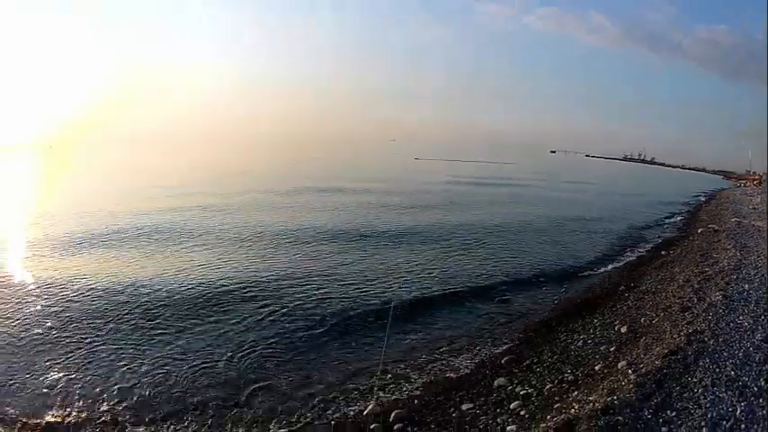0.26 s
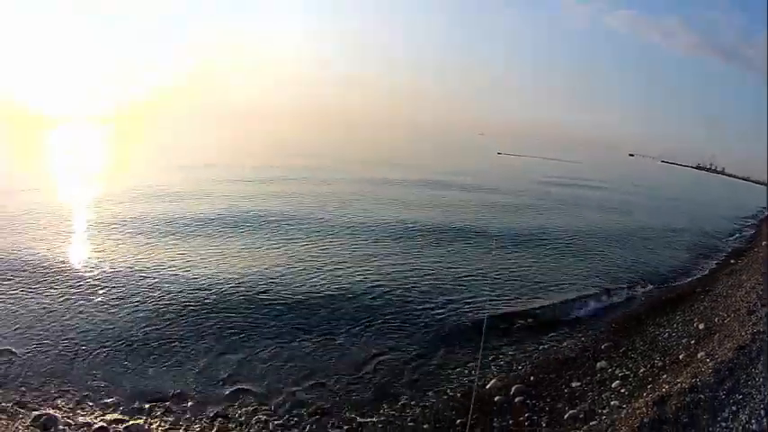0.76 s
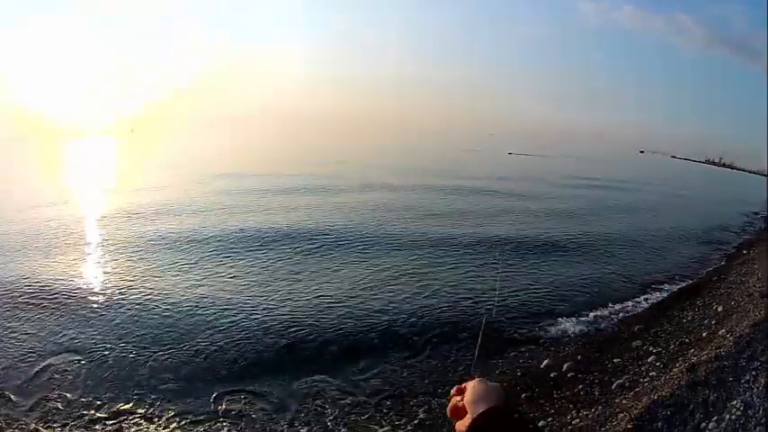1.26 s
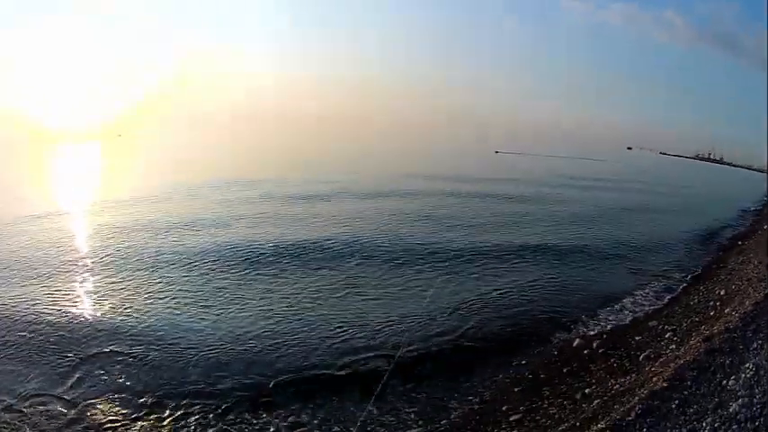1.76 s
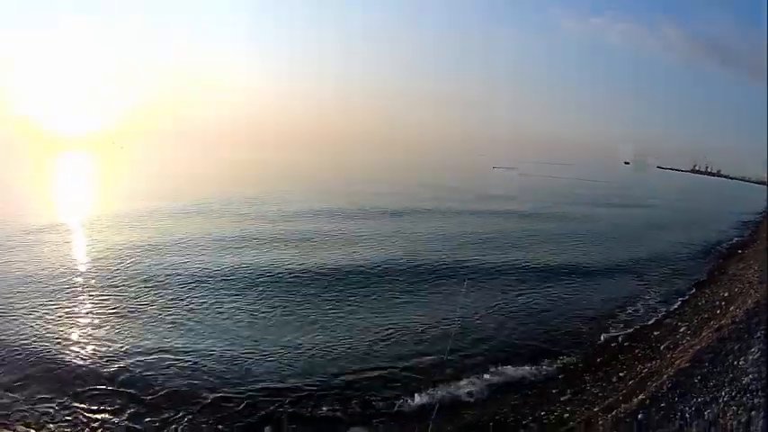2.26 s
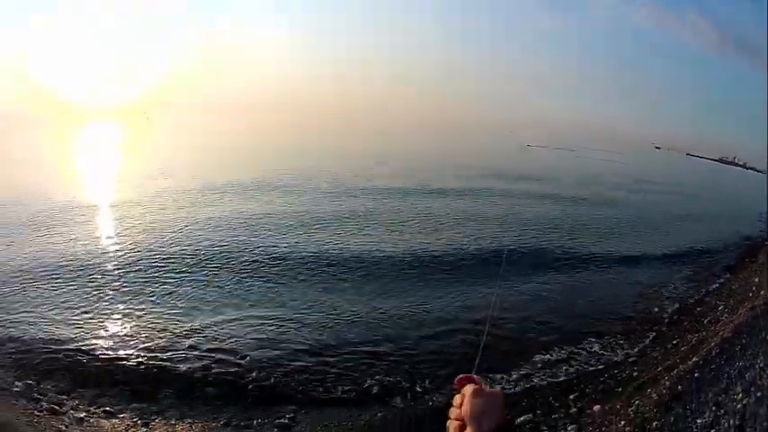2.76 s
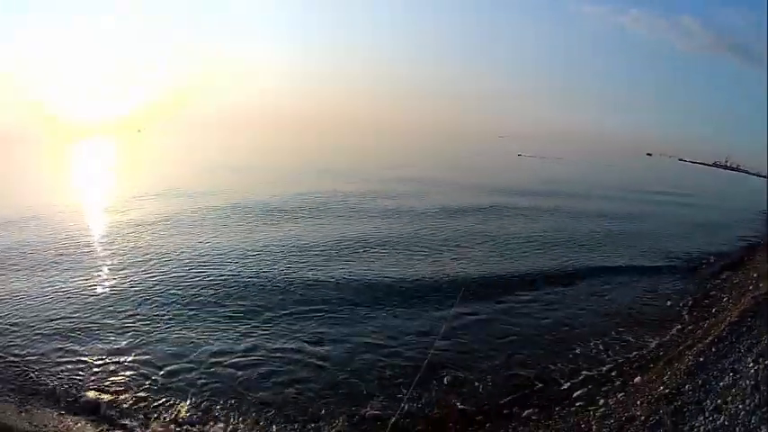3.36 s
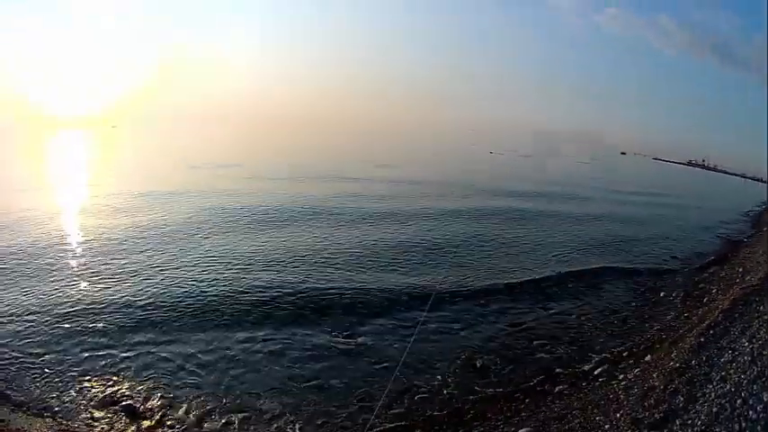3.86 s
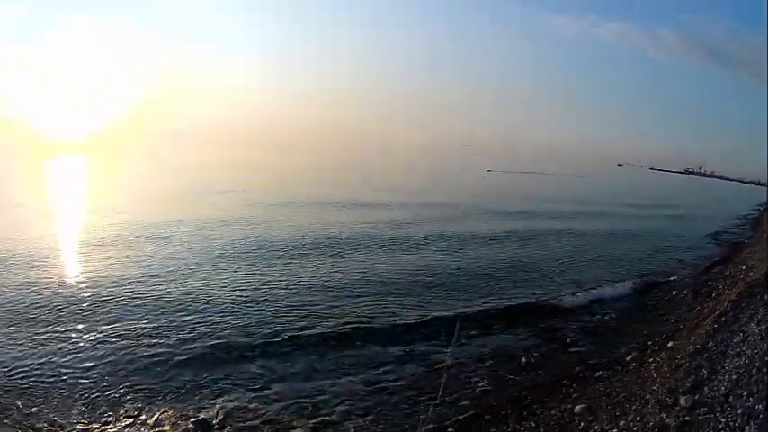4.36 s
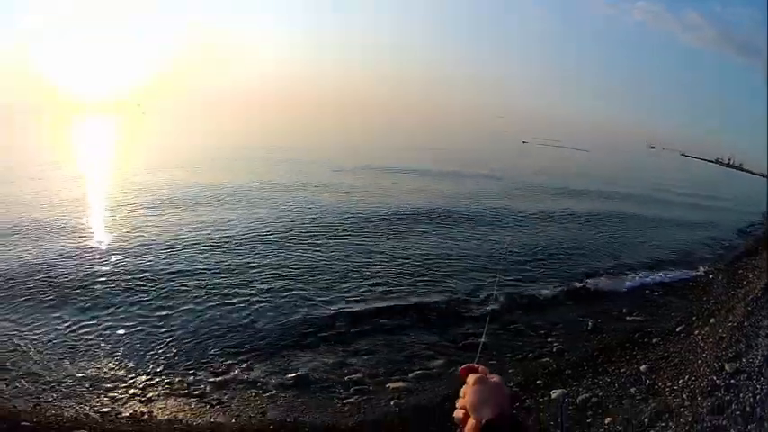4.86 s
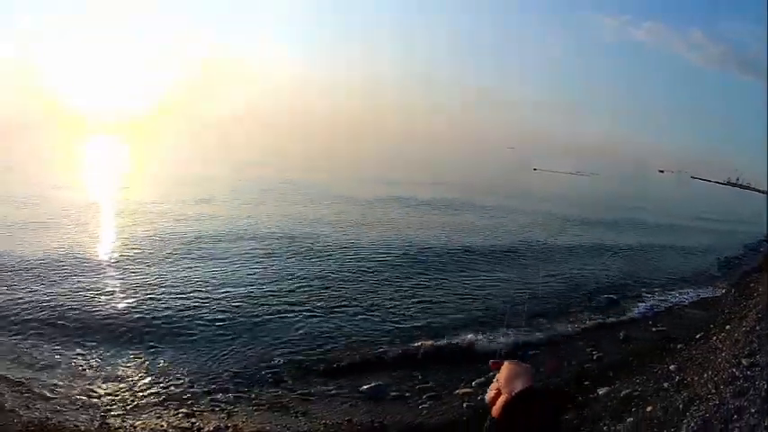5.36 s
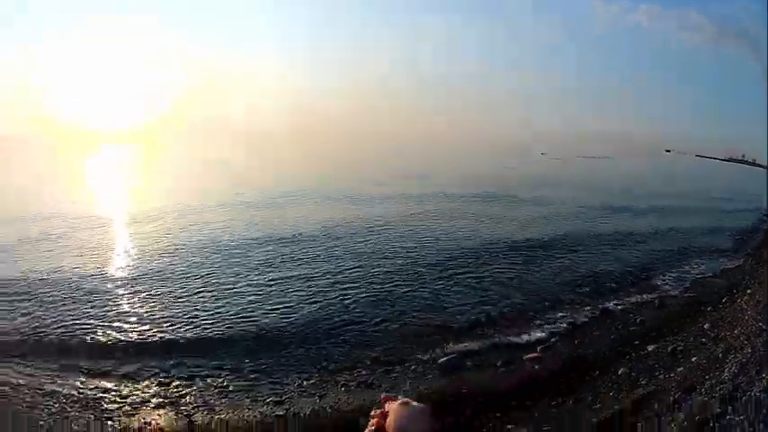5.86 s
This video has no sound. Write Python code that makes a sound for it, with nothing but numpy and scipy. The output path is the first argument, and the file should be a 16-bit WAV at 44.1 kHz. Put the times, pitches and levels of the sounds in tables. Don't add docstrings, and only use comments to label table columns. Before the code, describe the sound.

Close to the edge of a pebble beach, small waves wash in continuously with a muffled, bubbling gurgle. Air pockets gulp and large bubbles plop, the strongest one about a second in. Spray patters lightly, pebbles click faintly, and low wind rumbles unevenly on the microphone's case, which dulls the treble throughout.

```python
import sys
import numpy as np
from scipy import signal
from scipy.fft import rfft, irfft
from scipy.io import wavfile

SR = 44100
rng = np.random.default_rng(int(sys.argv[2]) if len(sys.argv) > 2 else 0)


def decibels_to_gain(level_db):
    exponent = np.asarray(level_db, float) / 20
    return 10 ** exponent


def master(y):
    cut = np.clip(np.atleast_2d(y).T, -1, 1)
    pcm = np.round(cut * 32767)
    wavfile.write(sys.argv[1], SR, pcm.astype(np.int16))


N = 269010

# (frequency [Hz], gain [dB])
CASE_RESPONSE = [(90, -17), (140, -7), (560, -1.5), (1430, -3.5), (1950, -14), (2600, -21), (3050, -25.5),
                 (3850, -24), (4450, -34), (6150, -33), (7950, -49.5), (8600, -46), (9600, -54.5),
                 (13000, -79)]
# (time [s], vigour [dB], share of big air pockets [dB])
SHORE_VIGOUR = [(0.0, -32.5, -8), (0.39, -42, -3.5), (0.47, -39, -6), (0.95, -35, 0), (1.19, -40.5, 1),
                (1.95, -44.5, -6.5), (2.1, -38, -4), (2.36, -37, -3), (2.53, -42.5, -6.5), (3.0, -43.5, 0),
                (3.2, -37.5, -6.5), (3.72, -45, -2.5), (4.33, -37, -6), (4.66, -37, -4), (4.8, -40.5, -3),
                (5.2, -38, -6), (5.45, -40, -8.5), (6.1, -43.5, -3.5)]


def rms_one(x):
    return x / np.sqrt(np.mean(x ** 2) + 1e-20)


def in_time(rows):
    s, *columns = np.transpose(rows)
    return [np.interp(np.arange(N) / SR, s, column) for column in columns]


def bursts(rows, attack_s, fade_db_per_s):
    s, length, db, *shares = np.transpose(rows)[:, :, None]
    coarse = np.arange(0, N, 32)
    age = coarse / SR - s
    rise = np.clip(age / attack_s + 1, 0, 1) ** 2
    power = rise * decibels_to_gain(2 * (db - fade_db_per_s * np.maximum(age - length, 0)))
    totals = [np.sum(power * decibels_to_gain(2 * share), axis=0) for share in [0, *shares]]
    return [np.interp(np.arange(N), coarse, total) for total in totals]


def band(x, low_hz, high_hz):
    return signal.sosfilt(signal.butter(2, [low_hz, high_hz], "band", fs=SR, output="sos"), x)


def drift(rate):
    r = np.exp(-80 * np.pi * rate / SR)
    slow = signal.lfilter([1], [1, -2 * r, r * r], rng.standard_normal(N // 40 + 2002))[2000:]
    return np.interp(np.arange(N) / 40, np.arange(len(slow)), rms_one(slow))


def response(points, size=16384):
    point_hz, point_db = np.transpose(points)
    hz = np.maximum(np.fft.rfftfreq(size, 1 / SR), 1)
    log_gain = np.log(decibels_to_gain(np.interp(np.log(hz), np.log(point_hz), point_db)))
    cepstrum = irfft(log_gain)
    cepstrum[1:size // 2] *= 2
    cepstrum[size // 2 + 1:] = 0
    return irfft(np.exp(rfft(cepstrum)))[:size // 2]


def through(x, impulse):
    return signal.oaconvolve(x, impulse)[:len(x)]


def bubble(hz, cycles, rise):
    turns = np.arange(int(cycles / hz * SR)) * hz / SR
    return np.sin(2 * np.pi * turns * (1 + rise * turns / cycles / 2)) * decibels_to_gain(-60 * turns / cycles)


def swarm(low_hz, high_hz, per_s, cycles, spread_db, clump_db, far_db, largest, count=12):
    sizes = decibels_to_gain(spread_db * np.minimum(rng.exponential(1, N), largest)) * rng.choice([-1, 1], N)
    clumps = decibels_to_gain(clump_db * (.6 * drift(13.0) + .8 * drift(40.0)))
    born = rng.random(N) < per_s * clumps / SR
    births = sizes * born
    dealt = rng.integers(0, count, N)
    pitches = np.geomspace(low_hz, high_hz, count)
    near = sum(hz * through(births * (dealt == k), bubble(hz, cycles, rise=0.26))
               for k, hz in enumerate(pitches))
    blur = band(rng.standard_normal(N), low_hz, high_hz)
    far = band(blur, low_hz * 1.197, high_hz * 1.33) * clumps ** 0.12
    return rms_one(through(rms_one(near) + decibels_to_gain(far_db) * rms_one(far), response(CASE_RESPONSE)))


def wash():
    # (time [s], length [s], level [dB], share of big air pockets [dB])
    surges = [(0.0, 0.016, -45, 5.5), (0.08, 0.088, -44, 4.5), (0.41, 0.03, -55, 15.5),
              (0.88, .14, -57, -6), (1.02, 0.023, -51, 4), (1.23, 0.16, -46, 3), (1.97, 0.015, -43, 4),
              (2.03, .05, -40, -18), (2.24, 0.07, -45.5, 7.5), (2.57, 0.035, -43, -1),
              (2.62, 0.072, -48, 2), (2.84, .06, -57, 9), (3.08, 0.045, -49, 1.5), (3.14, 0.026, -43.5, -6),
              (3.36, 0.11, -43.5, -19), (3.56, 0.091, -42.5, -7), (4.14, 0.042, -40, -0.5),
              (4.31, 0.087, -47, -12), (4.68, 0.045, -44, 1.5), (5.15, 0.17, -45, -1),
              (5.55, 0.26, -44.5, -9), (5.775, 0.064, -38.5, -5.5), (1.36, 0.16, -45.5, -11),
              (3.95, 0.17, -51.5, 5), (2.92, 0.15, -47, -10)]
    vigour_db, pockets_db = in_time(SHORE_VIGOUR)
    small, big = bursts(surges, attack_s=0.013, fade_db_per_s=246)
    gurgle = swarm(140.7, 534.0, per_s=450, cycles=22.4, spread_db=3.0, clump_db=2.5,
                   far_db=1.6, largest=2.5)
    bubbles = swarm(567, 1878, per_s=1400, cycles=22.4, spread_db=3.0, clump_db=4.0,
                    far_db=1.8, largest=2.7, count=18)
    steady = decibels_to_gain(2 * (vigour_db - 1.6))
    gurgle_power = steady * decibels_to_gain(2 * (pockets_db + 0.26)) + big
    return np.sqrt(gurgle_power) * gurgle + np.sqrt(steady + small) * bubbles


def spray():
    # (time [s], length [s], level [dB], share of spatter [dB], share of foam [dB])
    splashes = [(0.0, 0.28, -51.5, -13, -11), (0.36, 0.092, -55, -9, -13), (0.485, 0.025, -49, -5.5, -11.5),
                (0.57, 0.11, -56, -11, -8), (0.705, 0.26, -49.5, -7, -13.5), (1.03, 0.41, -55.5, -3.5, -13),
                (1.46, 0.3, -55.5, -9.5, -18), (1.97, 0.12, -50, -5.5, -15), (2.14, 0.21, -50.5, -5, -18),
                (2.47, 0.039, -49.5, -11, -27), (2.555, 0.056, -53, -5.5, -14),
                (2.645, 0.031, -54.5, -8.5, -18), (2.77, .1, -66.5, 1, -14), (3.06, 0.091, -54, -4.5, -10),
                (3.22, 0.14, -56, -0.5, -15), (3.39, 0.054, -53.5, -3, -19), (3.56, 0.11, -52, -3, -10.5),
                (4.09, 0.18, -53, -7.5, -11), (4.35, .31, -52, -7.5, -13.5), (4.7, 0.054, -52, -6, -11.5),
                (4.81, .04, -61, -6, -12), (4.93, 0.18, -57.5, -6, -16), (5.17, 0.14, -54.5, 0, -9),
                (5.33, 0.061, -66, -7, 0), (5.52, .04, -65, 3, -9), (5.6, 0.16, -60.5, -2, -17),
                (5.76, 0.065, -53, -3, -10), (5.84, 0.029, -59, 3, -13), (5.99, 0.091, -64.5, 0, -12)]
    trickle_db = (-59.5, -66.5, -69.2)
    vigour_db = in_time(SHORE_VIGOUR)[0]
    swing_db = 0.5 * (vigour_db - vigour_db.mean())
    trickle = [decibels_to_gain(2 * (db + swing_db)) for db in trickle_db]
    thrown = bursts(splashes, attack_s=0.045, fade_db_per_s=110)
    coarse, middle, fine = np.sqrt(np.add(thrown, trickle))
    splash = swarm(1825, 2910, per_s=890, cycles=11.8, spread_db=4.5, clump_db=5.5,
                   far_db=3.5, largest=3.6, count=8)
    spatter = swarm(3233, 4770, per_s=1200, cycles=48.0, spread_db=5.0, clump_db=3.0,
                    far_db=1.0, largest=3.3, count=8)
    fizz = swarm(4350, 12000, per_s=3000, cycles=16.0, spread_db=4.5, clump_db=5.0,
                 far_db=4.5, largest=3.5)
    landed = rng.random(N) < 500 * decibels_to_gain(5.0 * drift(25.0)) / SR
    ticks = landed * decibels_to_gain(3.0 * np.minimum(rng.exponential(1, N), 4)) * rng.choice([-1, 1], N)
    bright = band(band(ticks, 3060, 15000), 4230, 18000)
    droplets = rms_one(through(bright, response(CASE_RESPONSE)))
    foam = decibels_to_gain(4.5) * (fizz + decibels_to_gain(-7.5) * droplets)
    return coarse * splash + middle * spatter + fine * foam


def wind():
    # (frequency [Hz], gain [dB])
    rumble = [(7.1, -42), (12, -1), (48, 3.5), (140, -7), (200, -14.5), (260, -32), (440, -120)]
    # (time [s], strength [dB])
    breeze = [(0.0, -45), (1.39, -47.5), (2.19, -43), (2.33, -46), (3.19, -42), (3.41, -48), (3.7, -44.5),
              (4.15, -48.5), (4.4, -43.5), (5.21, -49), (5.96, -42), (6.1, -43)]
    # (time [s], length [s], level [dB])
    gusts = [(0.27, .05, -41), (0.49, 0.074, -49), (0.68, 0.042, -46), (0.92, 0.13, -46), (1.24, .04, -47),
             (1.45, 0.046, -39), (1.95, .05, -47), (2.13, .025, -40.5), (2.24, 0.024, -43),
             (2.33, .025, -53), (2.54, .08, -49), (3.22, 0.066, -53), (3.56, 0.03, -44), (3.66, 0.022, -44),
             (3.79, 0.076, -39), (4.15, 0.084, -44), (4.38, 0.025, -38), (4.52, .06, -50),
             (4.87, 0.036, -45), (4.98, 0.034, -45), (5.12, 0.047, -43), (5.29, 0.092, -45.5),
             (5.76, .18, -40.5)]
    breeze_db, = in_time(breeze)
    gust_power, = bursts(gusts, attack_s=0.022, fade_db_per_s=207)
    strength = np.sqrt(decibels_to_gain(2 * breeze_db) + gust_power) * decibels_to_gain(0.82 * drift(25.0))
    pressure = through(rng.standard_normal(N + SR), response(rumble))[SR:]
    return strength * rms_one(pressure)


def swells(rows, length_s):
    out, half = np.zeros(N + SR), round(length_s * SR / 2)
    age = np.arange(-half, half) / SR
    for s, peak_db, hz in rows:
        start = max(round(s * SR) - half, 0)
        tone = np.sin(2 * np.pi * hz * age * (1 + .03 * age / length_s))
        out[start:start + 2 * half] += decibels_to_gain(peak_db) * np.hanning(2 * half) * tone
    return out[:N]


def gulps():
    # (time of the middle [s], peak [dB], pitch [Hz])
    air_pockets = [(0.014, -41, 1170), (0.018, -31, 586), (0.024, -37, 1310), (0.07, -34, 950),
                   (0.078, -36, 750), (0.1, -31.5, 536), (0.118, -35, 220), (0.123, -37, 1560),
                   (0.124, -39, 1750), (0.128, -32, 690), (0.511, -33, 1180), (0.613, -32, 1140),
                   (0.637, -37, 1080), (0.641, -34, 320), (0.651, -34, 540), (0.742, -37.5, 1470),
                   (0.758, -35, 1060), (0.818, -29, 680), (0.896, -38, 1030), (0.984, -31, 880),
                   (1.062, -32.5, 603), (1.109, -30, 281), (1.382, -36, 320), (1.385, -37, 920),
                   (1.636, -40.5, 466), (2.061, -37, 1360), (2.065, -34, 1160), (2.239, -34, 560),
                   (2.239, -37, 1410), (2.271, -33, 278), (2.307, -35, 554), (2.651, -40, 1030),
                   (2.676, -39, 1520), (2.682, -38, 965), (2.889, -37, 1025), (3.141, -34, 1120),
                   (3.151, -36, 302), (3.273, -37, 1490), (3.33, -36, 470), (3.342, -36.5, 1470),
                   (3.514, -36, 1110), (3.636, -39, 1140), (3.668, -37, 1060), (4.165, -36, 740),
                   (4.319, -38, 1030), (4.368, -36, 1360), (4.885, -36, 744), (4.997, -38.5, 303),
                   (5.005, -34, 734), (5.092, -40, 1270), (5.196, -37, 412), (5.23, -31, 300),
                   (5.274, -37, 850), (5.534, -40, 340), (5.679, -37, 600), (5.762, -37, 340),
                   (5.801, -35, 1210), (5.819, -36, 1510), (5.827, -35, 1000), (5.865, -36.5, 1480)]
    # (time of the middle [s], peak [dB], pitch [Hz])
    flecks = [(0.228, -60.0, 4180), (0.483, -56.0, 3530), (0.485, -56.0, 3830), (0.515, -57.0, 4130),
              (0.72, -53.0, 3320), (0.931, -41.0, 1940), (0.937, -53.0, 3360), (1.001, -53.0, 3490),
              (1.588, -58.0, 3450), (2.514, -47.0, 2330), (2.579, -50.0, 2580), (2.591, -54.0, 3880),
              (3.227, -58.0, 4220), (3.592, -50.0, 3320), (3.666, -56.0, 3960), (3.677, -51.0, 2580),
              (3.681, -60.0, 4390), (3.836, -61.0, 3190), (4.094, -52.0, 4010), (4.094, -55.0, 2930),
              (4.151, -57.0, 3570), (4.696, -51.0, 3400), (4.879, -47.0, 1940), (4.95, -60.0, 3190),
              (5.281, -56.0, 3100), (5.287, -52.0, 3960), (5.301, -50.0, 3320), (5.758, -57.0, 2970),
              (5.804, -49.0, 2330), (5.848, -53.0, 3750)]
    # (time of the middle [s], peak [dB])
    slaps = [(0.2263, -27.0), (0.4328, -31.0), (0.5079, -28.0), (0.5184, -28.0), (0.8134, -26.0),
             (0.827, -25.0), (0.8937, -25.0), (1.1085, -28.0), (1.1183, -28.0), (1.332, -27.0),
             (1.9865, -29.0), (2.057, -28.0), (2.3419, -26.0), (2.4059, -30.0), (2.4802, -32.0),
             (2.6785, -29.0), (3.261, -29.0), (3.3368, -29.0), (3.4857, -31.0), (3.5908, -31.0),
             (3.672, -31.0), (3.7853, -34.0), (3.8085, -34.0), (3.9792, -32.0), (4.0858, -30.0),
             (4.1353, -26.0), (4.333, -28.0), (4.4067, -28.0), (4.4362, -26.0), (4.8308, -30.0),
             (5.1047, -29.0), (5.1213, -29.0), (5.1882, -27.0), (5.3982, -31.0), (5.5196, -29.0),
             (5.586, -31.0), (5.7092, -28.0), (5.7752, -27.0), (5.8018, -24.0), (5.8545, -31.0)]
    pitches = 1050 * np.exp(.2 * rng.uniform(-1, 1, len(slaps)))
    pitched_slaps = [(s, db - 1.5, hz) for (s, db), hz in zip(slaps, pitches)]
    return swells(air_pockets, .026) + swells(flecks, .012) + swells(pitched_slaps, .004)


def stones():
    # (time [s], peak [dB], lowest pitch [Hz], highest pitch [Hz])
    pebbles = [(0.0398, -39, 2870, 6560), (0.2274, -40, 2030, 3380), (0.4951, -44, 2800, 4500),
               (0.9218, -36, 3500, 7850), (0.9326, -38.5, 3080, 5700), (1.0004, -40, 2900, 4100),
               (1.2576, -43, 4500, 7800), (1.333, -42.5, 2800, 4700), (1.3325, -43, 1800, 2500),
               (4.0925, -45, 2000, 3000), (5.537, -44, 2000, 3000), (1.588, -48, 2800, 4300),
               (1.782, -52, 3300, 6200), (1.8897, -49, 2900, 4700), (1.9207, -49, 2900, 4800),
               (1.9844, -51, 2900, 4730), (2.4796, -53, 4000, 6400), (2.6066, -34, 2920, 4000),
               (2.4132, -50, 3500, 9000), (3.14, -43, 3500, 7900), (3.591, -46, 3000, 4000),
               (3.7158, -50, 2900, 5030), (3.812, -59, 4500, 5700), (3.835, -52, 3000, 5700),
               (3.909, -59, 3600, 6000), (4.092, -41, 2930, 5500), (4.161, -48, 2600, 7000),
               (4.698, -42.5, 3200, 11000), (5.0903, -44.5, 2080, 4300), (5.1864, -44, 2900, 5500),
               (5.226, -45, 4050, 7300), (5.299, -39, 2200, 4100), (5.3053, -38, 2600, 4500),
               (5.5363, -35.5, 3100, 7900), (5.964, -40, 2120, 4200)]
    # (time [s], peak [dB], lowest pitch [Hz])
    grit = [(0.6931, -56, 5700), (1.1082, -56, 5500), (1.1266, -59, 7800), (1.1341, -53, 5000),
            (1.214, -57, 5700), (1.2209, -65, 7800), (1.3052, -54, 6600), (1.3312, -53, 6400),
            (1.428, -50, 4600), (1.266, -58, 5000), (1.383, -60, 5500), (4.037, -60, 5500),
            (5.447, -57, 4000), (1.4903, -57, 6000), (1.5931, -57, 5300), (1.7258, -56, 3300),
            (2.0381, -51, 5670), (2.1957, -60, 5900), (2.2446, -50, 6200), (2.3303, -55, 7200),
            (2.489, -54, 4000), (2.5903, -61, 7600), (2.3219, -60, 6200), (3.095, -50, 3200),
            (3.2209, -53, 5200), (3.2832, -58, 5300), (3.5851, -53, 4900), (3.6544, -50, 5200),
            (4.121, -51, 4200), (4.1215, -48, 2700), (4.787, -58, 6300), (2.138, -58, 5200),
            (3.636, -55, 5300), (3.067, -57, 5500), (4.5803, -57, 6500), (5.356, -48, 4200),
            (5.3885, -62, 9000), (5.5192, -52, 4500), (5.542, -57, 5400)]
    # (time [s], peak [dB], lowest pitch
    # [Hz])
    more_pebbles = [(0.72, -48, 2400), (1.1842, -50, 4000), (2.197, -51, 5900), (2.49, -42, 2100),
                    (2.5005, -52, 4000), (2.5911, -49, 5300), (2.6676, -48, 3200), (2.6821, -47, 2100),
                    (2.792, -56, 3500), (3.4215, -46, 3000), (3.432, -45, 2800), (4.703, -46, 2600),
                    (4.7519, -49, 2900), (4.7631, -50, 2500), (4.8259, -53, 2600), (5.4588, -51, 2900),
                    (5.5988, -49, 2400)]
    pebble_contact_ms, grit_contact_ms = .4, .2
    clicks = [(*row, pebble_contact_ms) for row in pebbles]
    clicks += [(s, db, hz, hz * 1.55, grit_contact_ms) for s, db, hz in grit]
    clicks += [(s, db, hz, hz * 1.5, pebble_contact_ms) for s, db, hz in more_pebbles]
    t, case = np.arange(600) / SR, response(CASE_RESPONSE)[:600]
    rattles, out = rng.standard_normal((len(clicks), 600)), np.zeros(N + 600)
    cracks = band(band(rattles * (t < .0004), 6000, 14000), 8300, 16000)
    for (s, peak_db, low_hz, high_hz, contact_ms), rattle, crack in zip(clicks, rattles, cracks):
        touch = rattle * np.exp(-(1000 * t / (0.74 + contact_ms)) ** 2)
        ring = band(band(touch, low_hz, high_hz), low_hz * 0.91, 16000)
        crack_db = 0.5 + 18 * np.log2(min(high_hz / 7500, 1))
        heard = through(ring + decibels_to_gain(crack_db) * crack, case)
        knock = band(touch, 1700, low_hz)
        heard = heard / np.abs(heard).max() + decibels_to_gain(-8.0) * knock / np.abs(knock).max()
        start = round(s * SR)
        out[start:start + 600] += decibels_to_gain(peak_db + 3.5) * heard
    return out[:N]


def plops():
    # (time [s], peak [dB], pitch [Hz], ringing [cycles])
    large_bubbles = [(0.07, -28.5, 585, 86), (0.12, -25.5, 1840, 34), (0.4995, -24, 690, 18),
                     (0.501, -28, 1310, 37), (0.5465, -23, 1116, 25), (0.886, -28.5, 1660, 45),
                     (0.975, -20, 710, 9.3), (1.028, -9.5, 660, 8.7), (1.04, -26.5, 569, 39),
                     (1.353, -23.5, 830, 25), (1.977, -24.5, 1035, 63), (2.045, -25, 990, 19),
                     (2.192, -27.5, 814, 57), (2.344, -23.5, 571, 43), (2.586, -26, 683, 21),
                     (2.668, -22, 1015, 16), (3.137, -23.5, 920, 22), (3.169, -22, 792, 35),
                     (3.169, -19, 1330, 22), (3.512, -19.5, 780, 23), (3.513, -20.5, 1480, 15),
                     (0.121, -25, 1200, 20), (4.315, -27.5, 555, 25), (4.433, -27, 880, 52),
                     (5.494, -23, 720, 16), (5.525, -32.5, 1580, 51), (5.796, -25, 710, 26)]
    # (time [s], peak [dB], pitch [Hz])
    glugs = [(0.8, -25.5, 126), (0.885, -23, 284), (1.103, -24, 268), (1.983, -20.5, 307),
             (1.992, -26, 200), (2.015, -28, 172), (2.261, -29, 260), (2.268, -18.5, 470),
             (2.585, -23, 433), (3.093, -27, 133), (3.301, -26.5, 227), (4.155, -26, 320),
             (4.404, -30, 113), (5.167, -29, 328), (5.221, -26, 305), (5.78, -25.5, 203), (5.807, -29, 277)]
    # (time [s], peak [dB], pitch [Hz])
    drips = [(0.139, -37, 2239), (0.221, -34, 2180), (0.926, -43, 1952), (1.325, -37, 2000),
             (2.507, -55, 2330), (3.135, -34, 2030), (3.137, -43, 2290), (3.661, -41, 2239),
             (3.918, -40, 2350), (2.612, -32.5, 3620), (2.612, -42, 5900), (2.608, -52, 5800),
             (4.157, -37, 2450)]
    glug_cycles, drip_cycles = 11.5, 42
    events = [*large_bubbles]
    events += [(*row, glug_cycles) for row in glugs]
    events += [(*row, drip_cycles) for row in drips]
    out = np.zeros(N + SR)
    for s, peak_db, hz, cycles in events:
        ring = bubble(hz, np.clip(1.25 * cycles, 4, 90), rise=0.053)
        ring = ring * (1 - np.exp(-np.arange(len(ring)) * hz / SR / .6))
        start = round(s * SR)
        out[start:start + len(ring)] += decibels_to_gain(peak_db - 1.5) * ring
    return out[:N]


def mist():
    # (time [s], length [s], level [dB])
    puffs = [(0.915, .02, -80), (1.1, .04, -75), (1.22, .01, -79), (2.02, .03, -81), (2.29, .02, -78),
             (2.49, .015, -80), (2.585, .01, -78), (3.6, .08, -80), (4.578, .006, -75), (4.695, .01, -74),
             (5.2, .03, -82), (5.29, .03, -77), (5.38, .015, -75), (5.52, .025, -81)]
    power, = bursts(puffs, attack_s=.006, fade_db_per_s=600)
    hiss = band(band(rng.standard_normal(N), 8000, 14000), 10000, 16000) * decibels_to_gain(5.0 * drift(200.0))
    return np.sqrt(power) * rms_one(through(hiss, response(CASE_RESPONSE)))


def scene():
    flickering_spray = spray() * decibels_to_gain(0.95 * drift(24))
    rest = wash() + wind() + gulps() + stones() + plops() + mist()
    return (flickering_spray + rest)[None]


def band_limit(x):
    return signal.sosfilt(signal.butter(12, 15550, fs=SR, output="sos"), x)


def record(dry):
    hiss = band(band(rng.standard_normal(dry.shape), 8500, 22000), 6000, 21000)
    notch_hz, notch_width_hz, notch_depth = 8050, 780, .6
    b, a = signal.iirnotch(notch_hz, notch_hz / notch_width_hz, fs=SR)
    ported = dry + notch_depth * (signal.lfilter(b, a, dry) - dry)
    hissing = ported + decibels_to_gain(-83 + 3.0) * rms_one(hiss)
    top_cut = signal.ellip(12, .3, 60, 15130, fs=SR, output="sos")
    return band_limit(signal.sosfilt(top_cut, hissing))


dry = scene()
out = record(dry)
master(out)
```